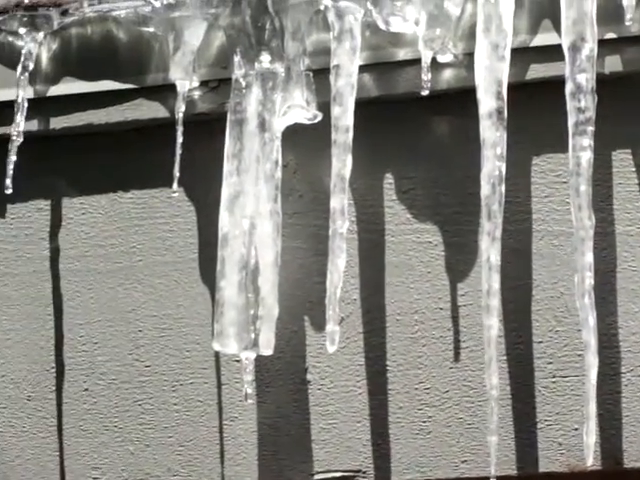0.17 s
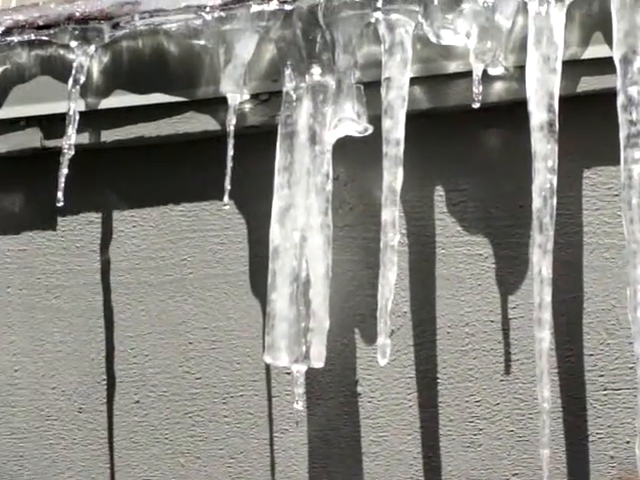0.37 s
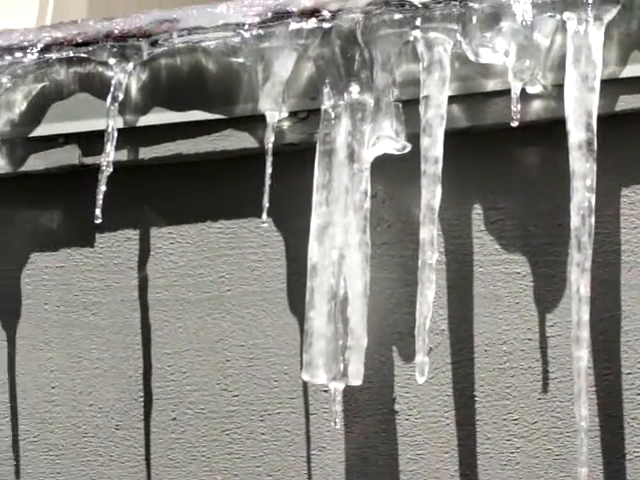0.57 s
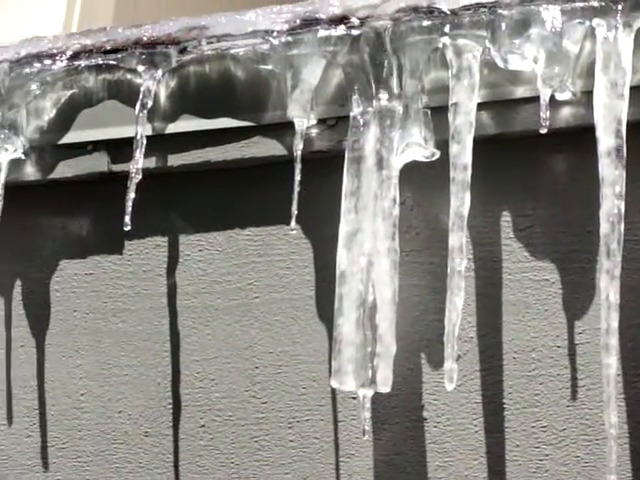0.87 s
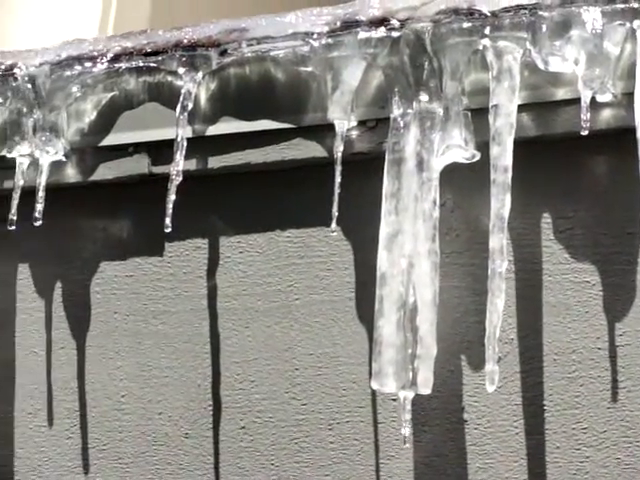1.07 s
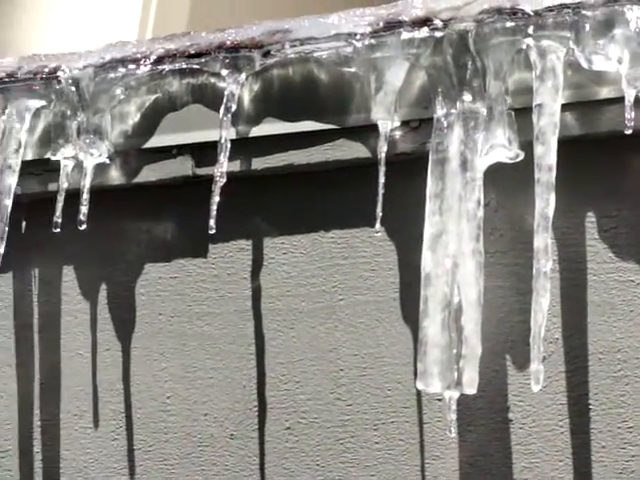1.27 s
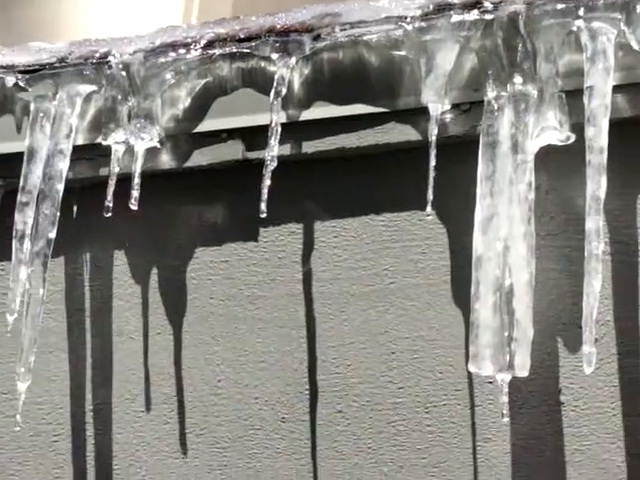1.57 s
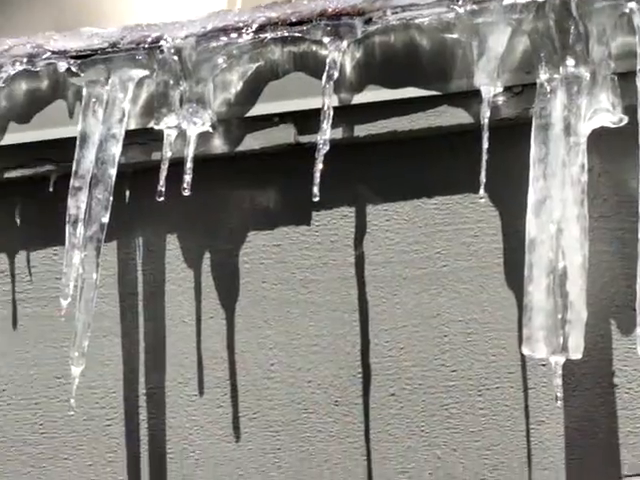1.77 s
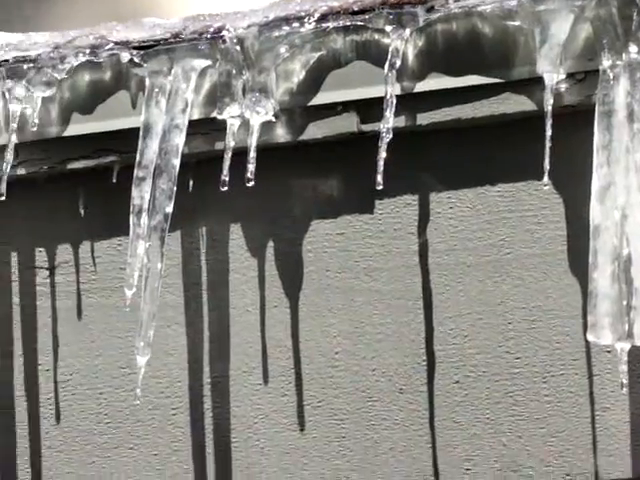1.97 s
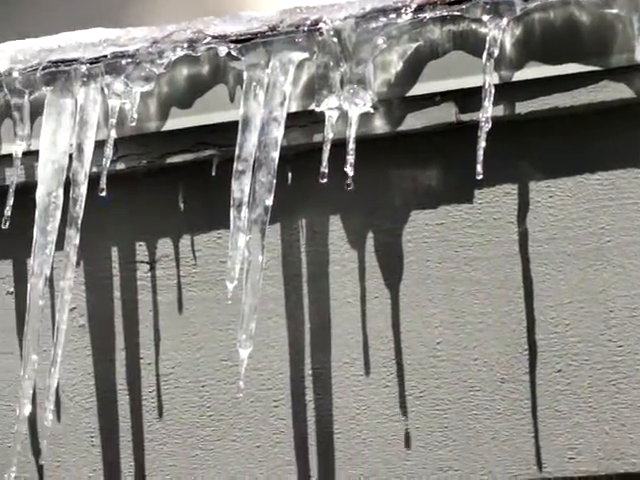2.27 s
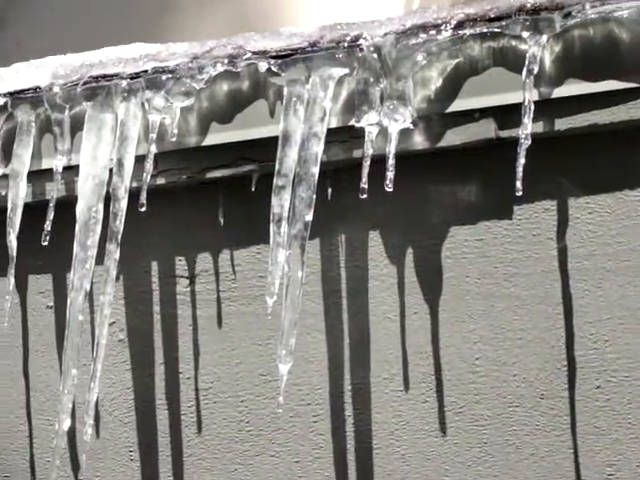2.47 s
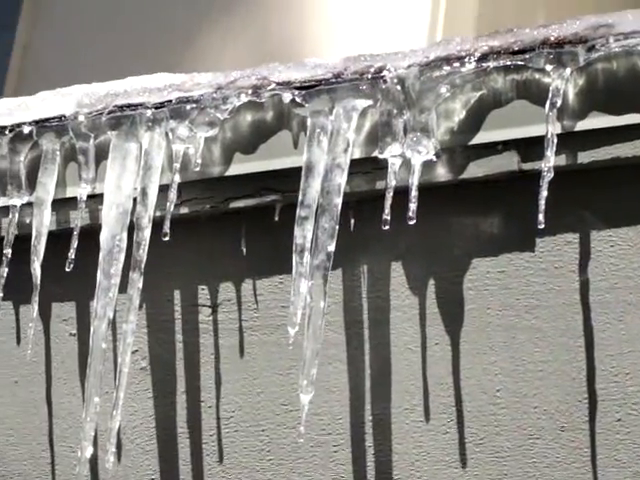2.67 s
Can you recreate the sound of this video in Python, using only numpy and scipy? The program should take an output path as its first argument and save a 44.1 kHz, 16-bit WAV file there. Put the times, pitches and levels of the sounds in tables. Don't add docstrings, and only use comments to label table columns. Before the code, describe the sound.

Icicle drips tick and splatter on the ground outdoors while small birds chirp over faint traffic

```python
import sys
import numpy as np
from scipy import signal
from scipy.io import wavfile
from scipy.ndimage import uniform_filter1d, minimum_filter1d

SR = 44100
rng = np.random.default_rng(int(sys.argv[2]) if len(sys.argv) > 2 else 0)


def inscribe(sig):
    pcm = np.round(np.clip(np.atleast_2d(sig).T, -1, 1) * 32767)
    wavfile.write(sys.argv[1], SR, pcm.astype(np.int16))


def amplitude_ratio(level_db):
    exponent = np.asarray(level_db, float) / 20
    return 10 ** exponent


N = 123921


def evened(x):
    return x / np.sqrt(np.mean(x ** 2) + 1e-20)


def curve(rows, column=1):
    rows = np.array(rows)
    return np.interp(np.arange(N) / SR, rows[:, 0], rows[:, column])


def add(mix, start_s, sound):
    part = mix[max(round(start_s * SR), 0):][:len(sound)]
    part += sound[:len(part)]


def resonate(x, hz, width_hz):
    turn = np.exp(2j * np.pi * hz * np.arange(len(x)) / SR)
    pole = np.exp(-np.pi * width_hz / SR)
    return 2 * (turn * signal.lfilter([1 - pole], [1, -pole], x / turn)).real


def noise(colour, patchy_db):
    frames, hz = N // 256 + 5, np.fft.rfftfreq(2048, 1 / SR)
    real, imag, patches = rng.standard_normal((frames, len(hz), 3)).T
    patches = uniform_filter1d(patches, size=20, axis=0)
    patches = evened(uniform_filter1d(patches, size=8, axis=1))
    colour_hz, colour_db = np.transpose(colour)
    shape_db = np.interp(np.log(hz + 1), np.log(colour_hz + 1), colour_db, left=-90, right=-90)
    spectra = (real + 1j * imag) * amplitude_ratio(shape_db[:, None] + patchy_db * patches)
    return evened(signal.istft(spectra, nperseg=2048, noverlap=1536)[1][:N])


def yard(x, t60_s):
    t = np.arange(SR // 2) / SR
    tail = rng.standard_normal(len(t)) * amplitude_ratio(-60 * t / t60_s) * (t > .004)
    return signal.fftconvolve(x, tail / np.linalg.norm(tail))[:N]


def town():
    # frequency [Hz], density [dB per Hz].
    traffic = [(88, -47.5), (150, -5), (490, -3.5), (662, -1.5), (845, -1), (1220, -5), (1580, -6.5),
               (1800, -11), (2400, -17.5), (3120, -68), (5280, -120)]
    hiss = [(1290, -16), (2200, -7), (4140, -2), (4510, -3.5), (4870, -3), (5470, -7), (8160, -12),
            (10300, -17.5), (13400, -55), (22000, -120)]
    rumble = [(20, -31), (33, -3), (46, 3.5), (62, 3.5), (80, -11.5), (120, 6), (160, -15.5), (230, -26)]
    # frequency [Hz], width [Hz], level [dB].
    drones = [(47, 10, -64), (120, 14, -70), (680, 70, -65), (1000, 110, -68), (1557, 80, -70),
              (1920, 45, -74), (7875, 35, -82)]
    out = amplitude_ratio(-50) * noise(traffic, patchy_db=1.18)
    out = out + amplitude_ratio(-54) * noise(hiss, patchy_db=2.1)
    out = out + amplitude_ratio(-63.5) * noise(rumble, patchy_db=-0.5)
    for hz, width_hz, db in drones:
        hum = resonate(rng.standard_normal(N), hz, width_hz)
        out = out + amplitude_ratio(db) * evened(resonate(hum, hz, width_hz))
    return out


def whistle(u, hz):
    return np.sin(np.pi * u) ** .5 * np.sin(2 * np.pi * np.cumsum(hz) / SR)


def chirp(length_s, first_hz, last_hz, size=6000):
    warble, rasp_db = .016, 3.5
    u = np.arange(0, length_s, 1 / SR) / length_s
    drift = uniform_filter1d(rng.standard_normal((2, size)), size=100, axis=1) * 10
    waver, rasp = drift[:, :len(u)]
    hz = (first_hz + (last_hz - first_hz) * u) * (1 + warble * waver)
    return amplitude_ratio(rasp_db * rasp) * whistle(u, hz)


def birds():
    # start [s], length [s], first pitch [Hz], last pitch [Hz], level [dB].
    near_chirps = [(0, .04, 7500, 6400, -58), (0, 0.1, 4130, 3670, -55), (0.035, 0.049, 5170, 5700, -48.5),
                   (0.05, 0.099, 5220, 5910, -57), (0.147, .055, 5180, 5040, -52.5),
                   (0.374, 0.028, 6050, 6260, -48.5), (0.384, 0.033, 4850, 4910, -49.5),
                   (0.699, 0.047, 4850, 5400, -49), (.702, 0.017, 4730, 3540, -47.5),
                   (0.757, 0.026, 3420, 3800, -48), (0.779, 0.0161, 5530, 4390, -46.5),
                   (0.802, 0.028, 5840, 5460, -52), (0.813, 0.034, 4000, 3510, -46),
                   (0.871, 0.086, 3970, 3730, -59), (1, 0.045, 4700, 4550, -69),
                   (1.185, 0.013, 3150, 2550, -53.5),
                   (1.4, 0.026, 4300, 3620, -53), (1.24, 0.028, 3970, 4300, -55),
                   (1.9, .04, 5600, 3100, -48), (1.785, .02, 3000, 2500, -54),
                   (1.779, 0.082, 3300, 2760, -59), (1.77, 0.027, 5800, 4200, -47),
                   (2.165, 0.024, 4200, 5900, -59), (2.255, 0.034, 5100, 5600, -53),
                   (2.29, 0.055, 5400, 5300, -54), (2.504, 0.047, 3340, 3670, -50.5),
                   (2.556, 0.02, 3500, 3250, -48.5), (2.59, 0.03, 4100, 4300, -51.5),
                   (2.605, .04, 4800, 4900, -52), (2.635, 0.033, 4900, 4500, -47.5),
                   (2.655, 0.042, 4800, 5300, -49), (2.68, 0.034, 5100, 4700, -52),
                   (2.71, 0.047, 4400, 4500, -53), (2.055, 0.011, 3700, 3520, -52.5)]
    # time [s], level [dB], mean pitch [Hz].
    flock = [(0, -58.5, 4790), (.25, -59, 4100), (.62, -109, 4300), (.75, -50, 4670), (.88, -58, 4150),
             (1.1, -74, 4280), (1.28, -56, 4280), (1.42, -57.5, 4590), (1.56, -79, 4260), (1.72, -57, 4390),
             (1.79, -51.5, 4030), (1.9, -52, 5230), (2.1, -55, 5600), (2.27, -50, 5700), (2.4, -54, 5655),
             (2.55, -50.5, 4840), (2.67, -51, 4800), (2.81, -55.5, 4410)]
    pitch_spread, glide_spread, direct_gain = .14, .13, .4
    near, far = np.zeros(N), np.zeros(N)
    for start_s, length_s, first_hz, last_hz, db in near_chirps:
        add(near, start_s, amplitude_ratio(db) * chirp(length_s, first_hz, last_hz))

    centre_hz = curve(flock, column=2)
    when = rng.random((1400, 2))
    how = np.clip(rng.standard_normal((1400, 3)), -1.7, 1.7)
    for (place, span), (pitch, glide, size_db) in zip(when, how):
        hz = centre_hz[int(place * N)] * np.exp(pitch_spread * pitch)
        call = chirp(.008 + .02 * span, hz, hz * np.exp(glide_spread * glide), size=1300)
        add(far, place * N / SR, amplitude_ratio(size_db) * call)
    far = evened(direct_gain * far + yard(far, t60_s=.13)) * amplitude_ratio(curve(flock))
    return near + amplitude_ratio(-5) * yard(near, t60_s=.14) + far


def wind():
    # time [s], level [dB].
    gust = [(0, -67), (.18, -62), (.24, -50), (.45, -64), (.6, -59), (.66, -47.5), (.76, -46.5), (.95, -62),
            (1.05, -73)]
    # frequency [Hz], density [dB per Hz].
    gust_colour = [(20, -29), (40, -8.5), (80, -1), (140, -20.5), (300, -11), (500, -42)]
    # time [s], peak [dB, the sign of the number giving polarity, + = inward], pitch [Hz].
    bumps = [
        (0.283, -39, 76),
        (0.397, -42, 55),
        (0.451, 40, 81),
        (.657, -44, 55),
        (0.6854, -30, 101),
        (.702, -38, 62),
        (0.739, -48, 292),
    ]
    out = amplitude_ratio(curve(gust)) * noise(gust_colour, patchy_db=5.0)
    for s, db, hz in bumps:
        u = np.arange(-SR / hz, SR / hz) * hz / SR
        push = np.sin(2 * np.pi * u) * np.exp(-(u / 0.33) ** 2)
        add(out, s - 1 / hz, np.sign(db) * amplitude_ratio(-abs(db)) * push)
    return out


def drips():
    # time [s], tick peak [dB], centre [Hz], splash re tick [dB], splash t60 [s].
    drops = [(0.5346, -28, 8600, -12.5, 0.075), (0.535, -38, 7060, -6, 0.078),
             (0.6134, -26.5, 3440, -8.5, 0.074), (.614, -36.5, 1790, -0.5, 0.11),
             (0.6133, -25, 6600, -8.5, 0.045), (0.802, -39.5, 8500, -5, 0.078),
             (0.9638, -32, 9200, -14, 0.05), (1.1188, -25, 5180, -6, 0.056),
             (1.1179, -30, 3340, -4.5, 0.16), (1.338, -16, 3210, -19.5, 0.12),
             (1.3381, -19.5, 5650, -6.5, 0.04), (1.339, -33, 3100, -5, 0.032),
             (1.459, -38, 9200, -4, 0.044), (1.48, -42.5, 8450, -3, 0.037), (1.9105, -25.5, 8800, 2, 0.021),
             (2.045, -33.5, 9200, -15, 0.028), (2.209, -41.5, 8250, 14, 0.019),
             (2.2341, -30.5, 9700, -11, 0.039)]
    tick_cycles, splash_width, splash_lag_s, spray_per_s = .9, .6, .003, 2200
    lead_s = .001
    out, t = np.zeros(N), np.arange(5000) / SR
    for s, db, hz, splash_db, t60_s in drops:
        u = (t - lead_s) * hz
        tick = np.cos(2 * np.pi * u) * np.exp(-(u / tick_cycles) ** 2)
        hits = rng.random(len(t)) < spray_per_s / SR
        spray = rng.standard_normal(len(t)) * (.35 + 2.5 * hits)
        for _ in range(3):
            spray = resonate(spray, hz, splash_width * hz)
        onset = np.clip(t / splash_lag_s, 0, 1) ** 3
        spray = evened(spray) * onset * amplitude_ratio(splash_db - 6 - 60 * t / t60_s)
        add(out, s - lead_s, amplitude_ratio(db) * (tick + spray))
    return out


def droplets():
    # time [s], peak [dB], pitch [Hz], length [s].
    rings = [(.631, -47, 8350, 0.0031), (.632, -53, 6200, 0.0033), (.6415, -51, 7200, 0.0024),
             (1.089, -44, 4800, 0.0033), (1.104, -43, 4800, 0.0035), (1.122, -35, 3630, 0.0014),
             (1.124, -31, 3900, 0.0017), (1.1225, -35, 5630, 0.0033), (1.128, -34, 5200, .003),
             (1.131, -35, 4270, .003), (1.1365, -34.5, 4200, .004), (1.138, -41, 5000, 0.0027),
             (1.147, -48, 4600, 0.0033), (1.308, -42.5, 6100, 0.0033), (1.3403, -30.5, 5600, 0.0017),
             (1.343, -35, 7500, 0.0017), (1.388, -39.5, 4500, .002), (1.339, -32, 3400, 0.0018),
             (1.344, -35, 6900, 0.0023), (1.347, -35, 4900, .005), (1.352, -49, 6800, 0.0018),
             (1.3555, -43, 6800, 0.0023), (1.362, -41, 4600, 0.002), (1.3635, -43, 6760, 0.0058),
             (1.3745, -42, 6730, 0.0041), (1.389, -39.5, 7000, .002), (1.419, -39.5, 5000, 0.0021),
             (1.4233, -39.5, 5000, 0.0024), (2.239, -40, 5440, .005)]
    out, t = np.zeros(N), np.arange(-600, 600) / SR
    for s, db, hz, length_s in rings:
        wander = np.cumsum(0.14 * rng.standard_normal(len(t)))
        ring = np.cos(2 * np.pi * hz * t + wander) * np.exp(-(2 * t / length_s) ** 2)
        add(out, s + t[0], amplitude_ratio(db) * ring)
    return out


def pips():
    # start [s], length [s], first pitch [Hz], last pitch [Hz], level [dB].
    clear_notes = [
        (2.37, 0.0216, 3200, 2550, -51),
        (2.376, 0.018, 3850, 2800, -53.5),
        (2.427, .023, 2500, 4000, -52),
        (2.764, 0.034, 3250, 2200, -52.5),
        (2.16, 0.015, 4500, 3600, -49),
        (2.172, 0.013, 3650, 3580, -48),
        (2.184, .013, 3670, 5300, -51),
        (1.81, 0.036, 5000, 3700, -58),
        (1.908, 0.021, 3400, 3800, -51.5),
        (2.21, 0.043, 4900, 4300, -50),
    ]
    out = np.zeros(N)
    for start_s, length_s, first_hz, last_hz, db in clear_notes:
        u = np.arange(0, length_s, 1 / SR) / length_s
        hz = first_hz + (last_hz - first_hz) * u ** 1.4
        add(out, start_s, amplitude_ratio(db) * whistle(u, hz))
    return out + amplitude_ratio(-5.5) * yard(out, t60_s=.14)


def scene():
    mono = town() + birds() + wind() + drips() + droplets() + pips()
    return np.array([mono, mono])


def lose_treble(x):
    # start [s], end [s], low edge [Hz], high edge [Hz].
    dropouts = [(.511, .525, 8800, 10200), (.516, .521, 6500, 8800), (.521, .531, 5800, 6900),
                (.582, .61, 5300, 8500), (.59, .608, 4000, 5300), (.592, .598, 2900, 4000),
                (.603, .608, 2900, 4000), (.625, .638, 6700, 7600), (.644, .651, 5000, 9300),
                (.944, .961, 8200, 10200), (1.086, 1.114, 5500, 7600), (1.146, 1.154, 5500, 8500),
                (1.314, 1.334, 6300, 7200), (1.349, 1.376, 7500, 8600), (1.349, 1.371, 5200, 6100),
                (1.362, 1.371, 2200, 3000), (1.397, 1.403, 6500, 8000), (1.44, 1.455, 8100, 8700),
                (1.879, 1.907, 6900, 10200), (1.924, 1.945, 9500, 10200), (1.932, 1.945, 8300, 9500),
                (1.923, 1.945, 7300, 8300), (2.025, 2.042, 7200, 8500), (2.2, 2.206, 7500, 10200),
                (2.216, 2.23, 8900, 10200), (2.22, 2.228, 6800, 7900)]
    dip_db, from_hz, hole_db, margin_hz = 5.3, 5200, -34, 150
    hz, t, z = signal.stft(x, SR, nperseg=256, noverlap=192)
    band = np.arange(len(hz)) // 3
    power = np.array([(abs(z[band == k]) ** 2).mean(0) for k in range(band[-1] + 1)])
    band_db = 10 * np.log10(uniform_filter1d(power, size=3, axis=1) + 1e-20)
    band_db = band_db - uniform_filter1d(band_db, size=101, axis=1)
    starved = minimum_filter1d(band_db, size=2, axis=1) < -dip_db
    hole = starved[band] & (hz > from_hz)[:, None]
    for start_s, end_s, low_hz, high_hz in dropouts:
        inside = (hz >= low_hz - margin_hz) & (hz <= high_hz + margin_hz)
        hole = hole | (inside[:, None] & (t >= start_s) & (t <= end_s))
    return signal.istft(z * amplitude_ratio(hole_db * hole), SR, nperseg=256, noverlap=192)[1][:N]


def roll_off(x):
    return signal.sosfilt(signal.butter(12, 10890, fs=SR, output="sos"), x)


def record(dry):
    mono = lose_treble(dry[0])
    low_pass = signal.firwin(1023, 10120, window=("kaiser", 9), fs=SR)
    mono = signal.oaconvolve(mono, low_pass, "same")
    return roll_off(np.array([mono, mono]))


dry = scene()
out = record(dry)
inscribe(out)
```